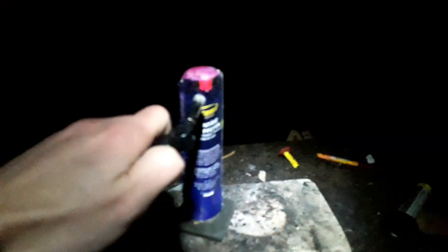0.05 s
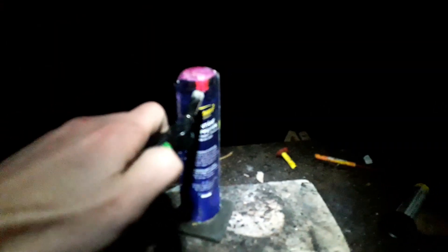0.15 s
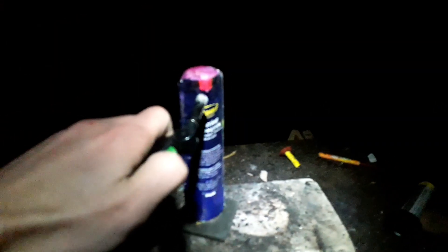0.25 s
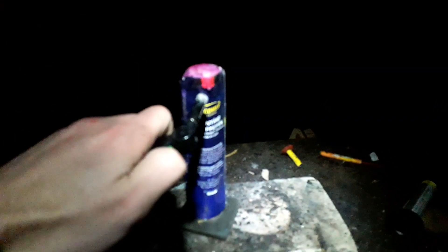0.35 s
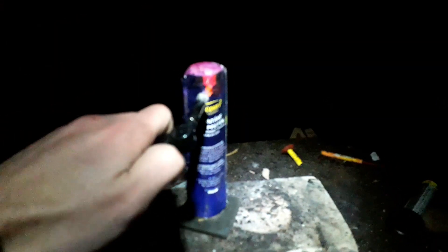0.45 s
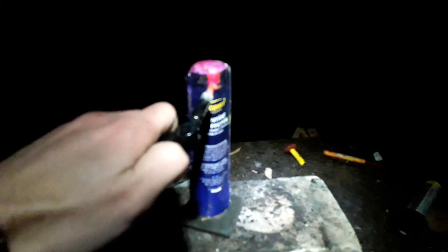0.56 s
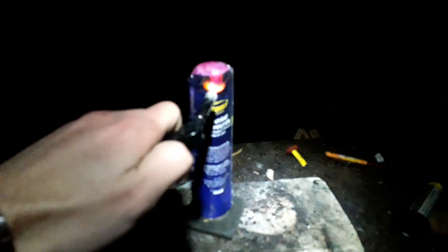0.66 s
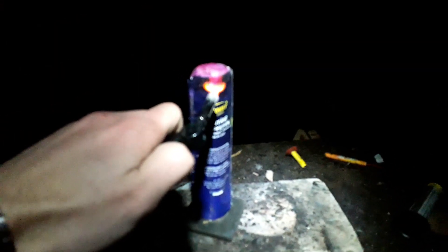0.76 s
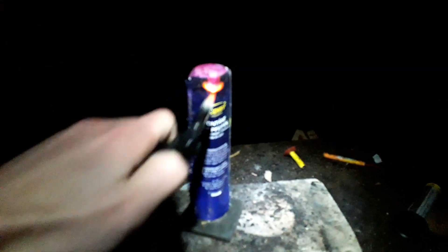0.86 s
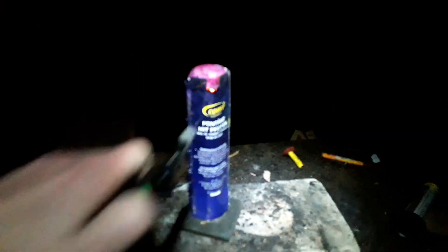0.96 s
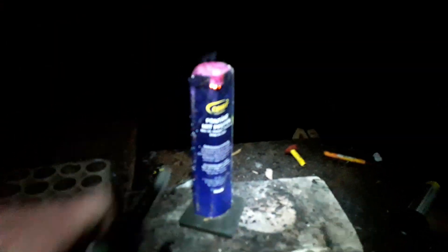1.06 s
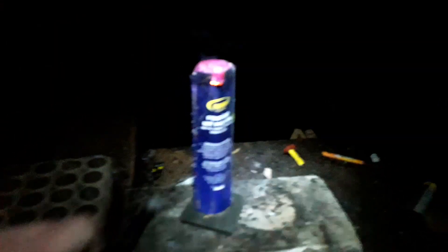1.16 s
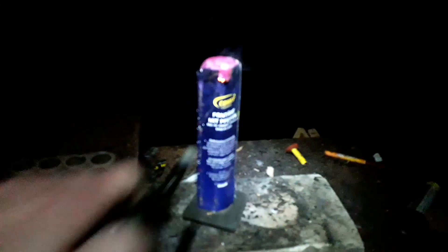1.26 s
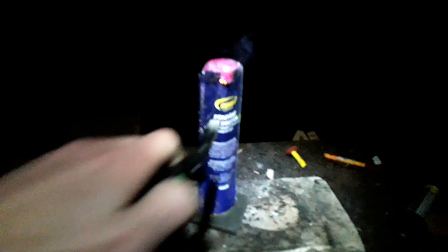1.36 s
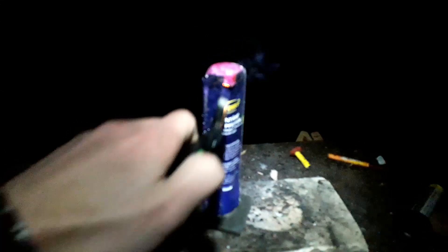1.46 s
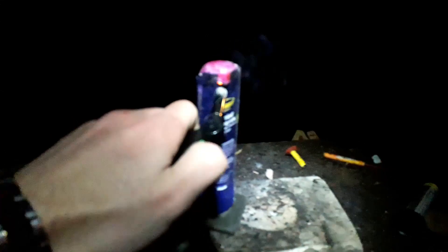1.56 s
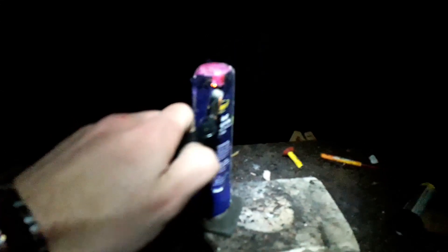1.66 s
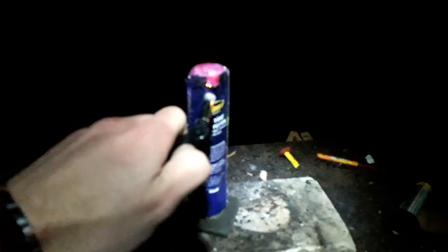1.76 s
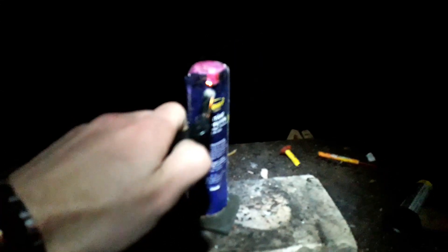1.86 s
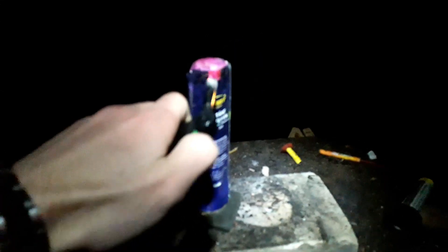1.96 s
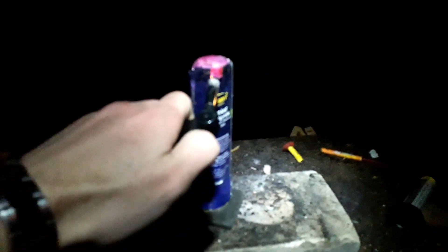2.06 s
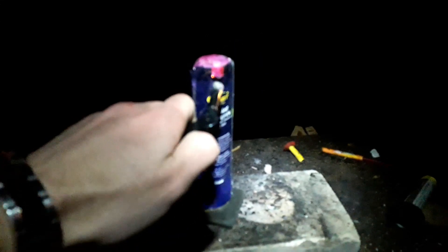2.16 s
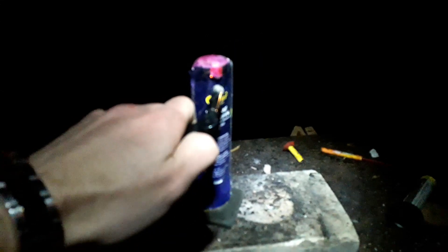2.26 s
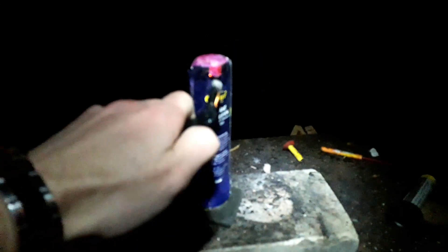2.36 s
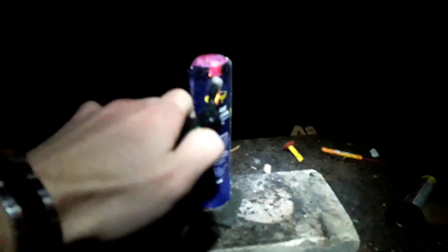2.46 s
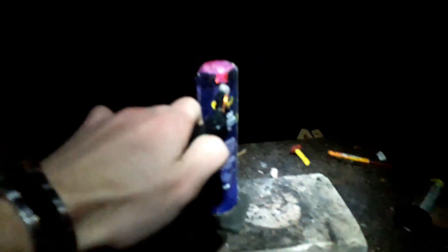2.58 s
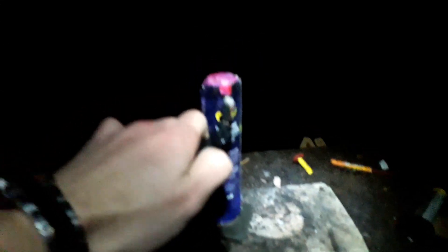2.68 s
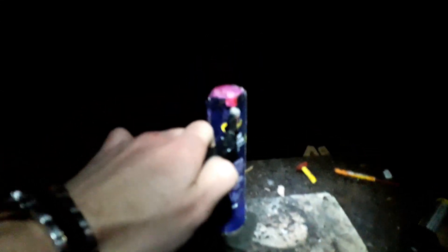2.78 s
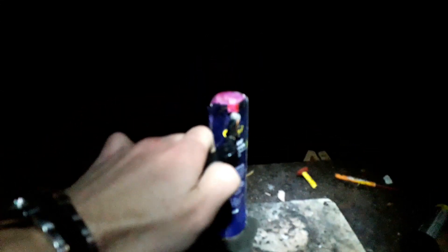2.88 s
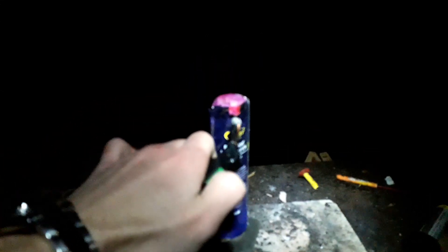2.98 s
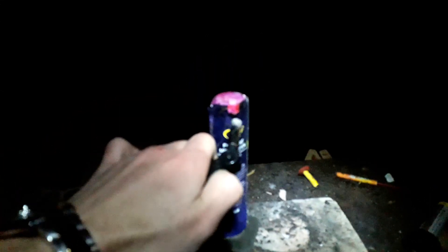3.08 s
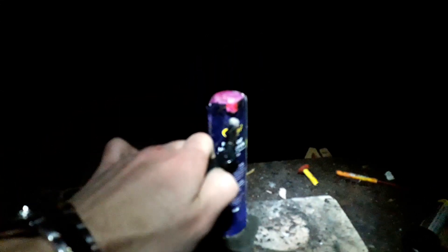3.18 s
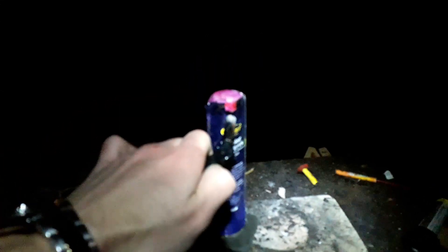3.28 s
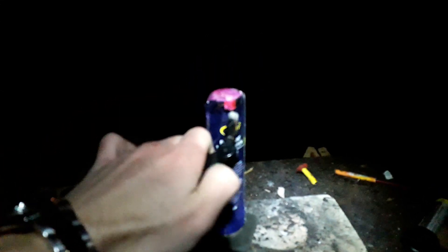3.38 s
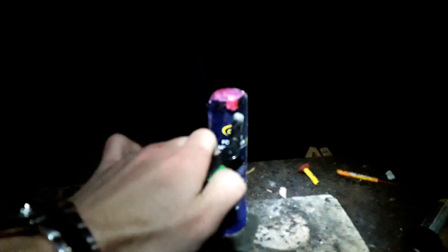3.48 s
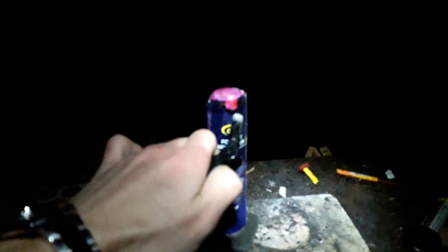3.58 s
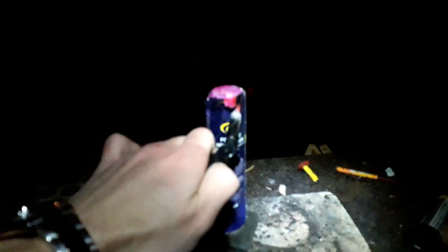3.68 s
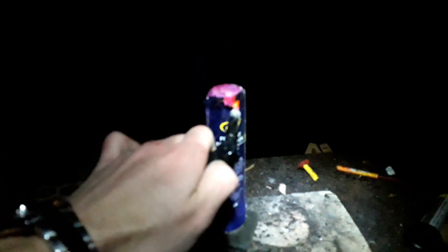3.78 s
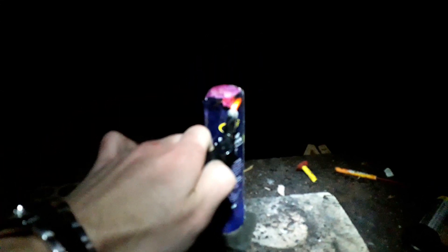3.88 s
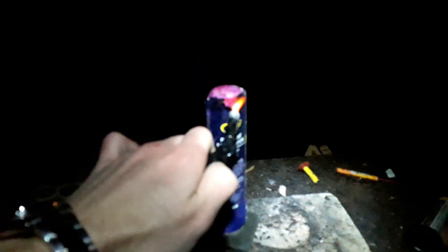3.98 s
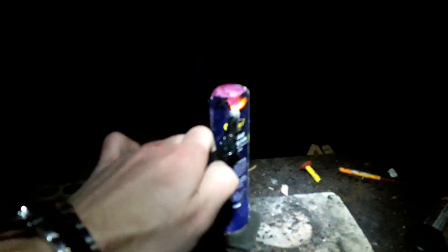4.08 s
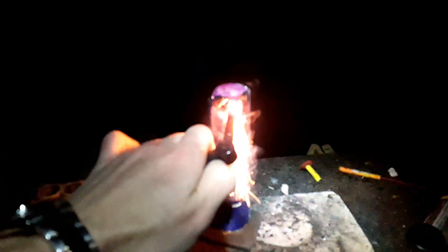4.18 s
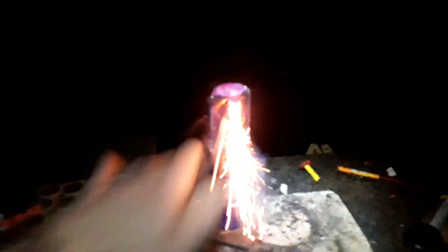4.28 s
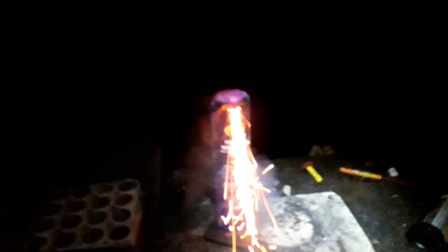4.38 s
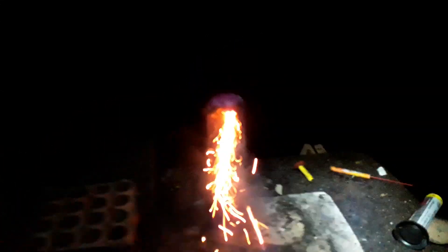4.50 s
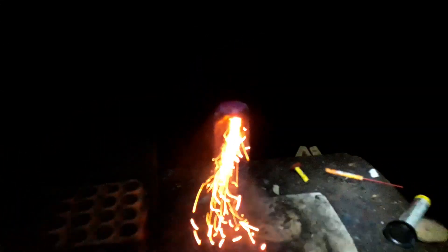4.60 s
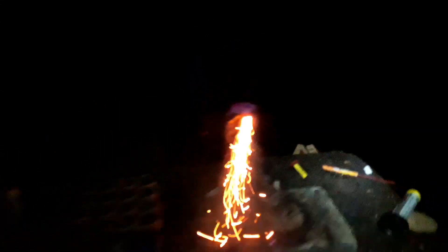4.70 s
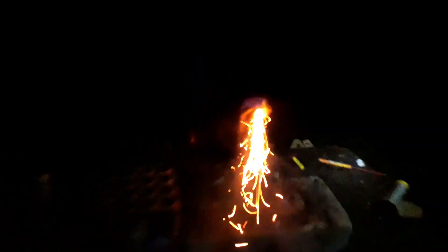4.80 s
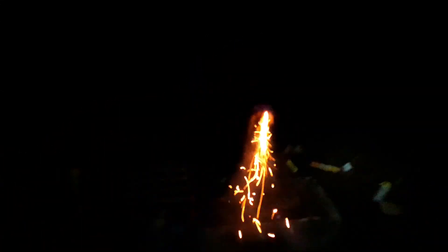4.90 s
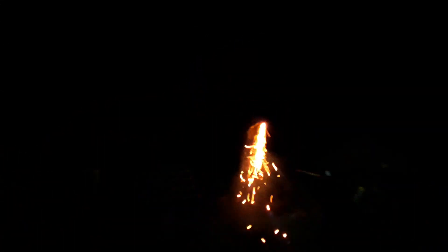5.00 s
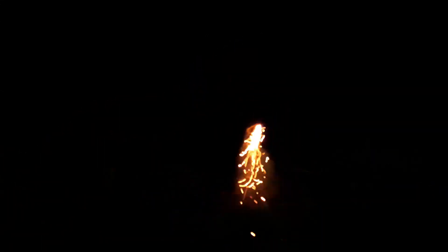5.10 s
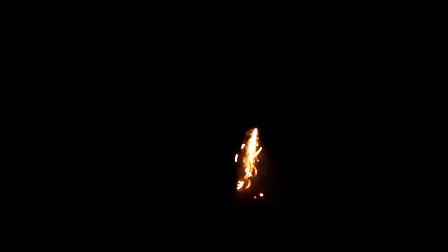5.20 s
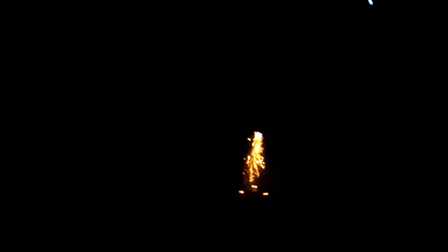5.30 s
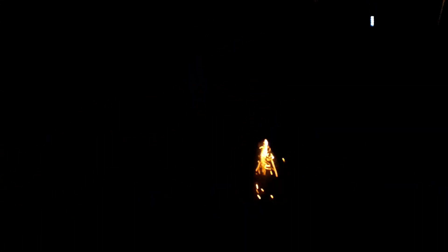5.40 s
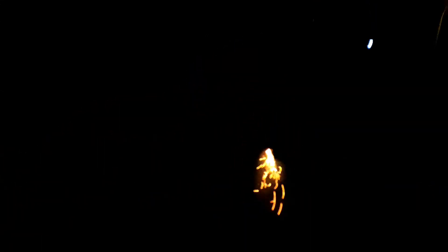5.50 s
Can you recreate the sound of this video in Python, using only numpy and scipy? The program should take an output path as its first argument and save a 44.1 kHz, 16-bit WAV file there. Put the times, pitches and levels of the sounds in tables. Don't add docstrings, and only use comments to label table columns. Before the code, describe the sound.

Hard metallic lighter clicks dominate in a dark yard, each followed by a lighter click as the trigger is released. Behind them are soft firework thumps, one stronger shot midway and brief dog yelps. The flame is nearly silent, then a fuse bursts into steady sputtering hiss, thinning and sweeping upward in tone as the listener retreats. A big firework blast rolls off houses; narrow-band, slightly clipped camera sound.

```python
import sys
import numpy as np
from scipy import signal
from scipy.fft import rfft, irfft, next_fast_len
from scipy.io import wavfile
from scipy.ndimage import uniform_filter1d, map_coordinates

SR = 44100
rng = np.random.default_rng(int(sys.argv[2]) if len(sys.argv) > 2 else 0)


def voltage_ratio(decibels):
    exponent = np.asarray(decibels, float) / 20
    return 10 ** exponent


def materialize(psi):
    bounded = np.clip(np.atleast_2d(psi).T, -1, 1)
    quanta = np.round(bounded * 32767).astype(np.int16)
    wavfile.write(sys.argv[1], SR, quanta)


N = 244622

# t/s, peak level/dB, top band/dB, low band/dB, rebound/dB
STRIKES = [
    (0.4452, 3.5, -3, -9.5, -2.5),
    (1.7209, 0.5, 0, -5, -4),
    (2.2136, 1, -1, -3.5, -3),
    (2.7273, 0, -2, -4, -5.5),
    (3.193, 1.5, -4.5, -6.5, -6),
    (3.669, 0, -4.5, -9.5, -1),
]
# t/s, hiss level/dB
FUSE_BURN = [(4.145, -38.5), (4.178, -34.5), (4.33, -27.5), (4.37, -29), (4.78, -29.5), (4.89, -28.5),
             (4.935, -33.5), (4.96, -29.5), (5.55, -36.5)]
# f/Hz, density/dB per Hz
JET_SPECTRUM = [(1180, -37.5), (2000, -7.5), (2400, -13), (2800, -26), (3390, -7.5), (3800, -6.5),
                (4400, -5.5), (4760, -2.5), (5510, -1), (6900, -10.5), (7460, -17.5), (8350, -6),
                (8800, -6), (12000, -19.5), (15800, -33.5)]
VALVE_S = 0.016


def in_time(rows, off=None):
    s, *columns = np.transpose(rows)
    return [np.interp(np.arange(N) / SR, s, c, left=off, right=off) for c in columns]


def rms_one(x):
    return x / np.sqrt(np.mean(x ** 2) + 1e-20)


def drift(rate):
    r = np.exp(-64 * np.pi * rate / SR)
    chance = rng.standard_normal(N // 32 + 1002)
    slow = signal.lfilter([1], [1, -2 * r, r * r], chance)[1000:]
    return np.interp(np.arange(N) / 32, np.arange(len(slow)), rms_one(slow))


def coloured(spectrum, patchy_db, shared_db, rate):
    size = next_fast_len(N)
    hz, db = np.transpose(spectrum)
    octave = np.log2(np.fft.rfftfreq(size, 1 / SR) + 1)
    shape = rfft(rng.standard_normal(size)) * voltage_ratio(np.interp(octave, np.log2(hz), db))
    out = 0
    for centre in range(int(np.log2(hz[0])), int(np.log2(hz[-1])) + 2):
        weight = np.clip(1 - abs(octave - centre), 0, 1)
        out = out + irfft(shape * weight, size)[:N] * voltage_ratio(patchy_db * drift(rate))
    return rms_one(out * voltage_ratio(shared_db * (drift(rate) + drift(4 * rate))))


def ring(force, hz, t60):
    r, w = voltage_ratio(-60 / (t60 * SR)), 2 * np.pi * hz / SR
    return signal.lfilter([.5, 0, -.5], [1, -2 * r * np.cos(w), r * r], force + 1e-18)


def band(x, low_hz, high_hz, order):
    return signal.sosfilt(signal.butter(order, [low_hz, high_hz], "band", fs=SR, output="sos"), x)


def low_pass(x, hz, order):
    return signal.sosfilt(signal.butter(order, hz, fs=SR, output="sos"), x)


def add(out, s, sound, peak_db):
    at = round(s * SR)
    out[at:at + len(sound)] += (voltage_ratio(peak_db) * sound / abs(sound).max())[:N - at]


def night():
    # f/Hz, density/dB per Hz
    hum_spectrum = [(20, -46), (40, -25), (100, -6), (200, -12), (500, -11), (800, -14), (1600, -23),
                    (2300, -28.5), (3100, -47.5), (4500, -44.5), (9000, -44.5), (15500, -54)]
    # t/s, level/dB
    town_level = [(0, -53), (2.0, -54.5), (2.5, -58.5), (3.2, -53.5), (4.2, -51.5), (5.55, -40)]
    mic_db, town_top_hz = -53, 3020
    noise = coloured(hum_spectrum, patchy_db=.9, shared_db=.3, rate=8)
    hz = np.fft.rfftfreq(N, 1 / SR)
    town = irfft(rfft(noise) / (1 + (hz / town_top_hz) ** 8), N)
    return voltage_ratio(in_time(town_level)[0]) * town + voltage_ratio(mic_db) * (noise - town)


def whisper():
    # opens t/s, shuts t/s, lower whisper/dB, upper whisper/dB
    openings = [
        (-.1, 0.21, -69, -70.5),
        (1.726, 2.01, -77.5, -73),
        (2.21, 2.474, -86, -79.5),
        (2.66, 2.967, -81, -80.5),
        (3.14, 3.462, -75.5, -79.5),
        (3.67, 3.718, -72, -80.5),
    ]
    # f/Hz, density/dB per Hz
    whisper_spectra = [
        [(3000, -31), (3700, -14), (4600, -10), (5100, 0.5), (5600, -20), (6300, -15.5), (7500, -22.5)],
        [(7000, -22.5), (8300, -9.5), (9400, -6.5), (10100, -0.5), (10900, -7), (11700, -13), (15500, -23)],
    ]
    surge_db, surge_t60_s = 4.5, 1
    t = np.arange(N) / SR
    lower, upper = 0, 0
    for opens, shuts, lower_db, upper_db in openings:
        flow = np.interp(t, [opens, opens + VALVE_S, shuts, shuts + VALVE_S], [0, 1, 1, 0])
        surge = 1 + voltage_ratio(surge_db - 60 * abs(t - opens) / surge_t60_s)
        lower = lower + voltage_ratio(lower_db) * flow * surge
        upper = upper + voltage_ratio(upper_db) * flow
    out = lower * coloured(whisper_spectra[0], patchy_db=0.8, shared_db=3.0, rate=25)
    return out + upper * coloured(whisper_spectra[1], patchy_db=3.0, shared_db=1.45, rate=28)


def rush():
    # t/s, level/dB
    hand_rub = [(0, -65), (.3, -71.5), (.5, -76.5), (.8, -73), (1.19, -77), (1.22, -92), (1.56, -84),
                (1.66, -62), (1.8, -65), (2.1, -72), (3.4, -74.5), (3.78, -83), (4.14, -92)]
    lag_s, rise_s, t60_s = .038, 0.026, 0.21
    puffs = np.zeros(N)
    puffs[[round((row[0] + lag_s) * SR) for row in STRIKES]] = voltage_ratio(-58)
    decay = signal.lfilter([1], [1, -voltage_ratio(-60 / (t60_s * SR))], puffs)
    puffs = uniform_filter1d(decay, round(rise_s * SR) + 1)
    level = np.hypot(puffs, voltage_ratio(in_time(hand_rub, off=-120)[0]))
    return level * coloured(JET_SPECTRUM, patchy_db=1.5, shared_db=1.2, rate=30)


def dog():
    # t/s, length/s, f/Hz, level/dB
    yelps = [
        (0.028, 0.065, 592, -55.5),
        (0.147, 0.14, 607, -46.5),
        (.32, 0.13, 609, -56),
    ]
    attack_s, hold, fade_db, sag_hz_per_s = .02, .5, 13, 330
    out = 0
    for s, length, start_hz, db in yelps:
        end = s + length
        hz, = in_time([(s, start_hz), (end, start_hz - sag_hz_per_s * length)])
        level, = in_time([(s, db + 0.5), (s + attack_s, db), (s + hold * length, db), (end, db - fade_db)],
                         off=-120)
        phase = 2 * np.pi * np.cumsum(hz) / SR
        for ratio, share, blur in ((1, 1, 70), (1.85, .5, 160), (2.85, .4, 140), (4.1, .15, 200)):
            tone = drift(blur) * np.sin(ratio * phase) + drift(blur) * np.cos(ratio * phase)
            out = out + voltage_ratio(level) * share * tone
    return out


def knock(modes, bands_db, rattle, rattle_s):
    # low f/Hz, high f/Hz
    housing_bands = [(1100, 2450), (3750, 6900), (7100, 10900), (11400, 13800)]
    t = np.arange(2500) / SR
    force = (t == 0) + rattle * rng.standard_normal(len(t)) * np.exp(-t / rattle_s)
    passed = sum(voltage_ratio(db) * band(force, low, high, order=5) for (low, high), db in zip(housing_bands, bands_db))
    rings = sum(voltage_ratio(db) * ring(force, hz, t60) for hz, db, t60 in modes)
    return passed + .3 * rings


def trigger(out):
    # t/s, peak level/dB, top band/dB
    creaks = [(.0807, -35, -17), (0.2493, -36, -15), (0.5082, -41, -1), (.524, -44, -11), (0.6854, -31, -3),
              (.703, -40, -3), (0.7542, -42.5, -12), (.325, -54, -10), (2.383, -52, -14),
              (1.1034, -46.5, -8.5), (1.542, -43.5, -14), (1.7832, -34, -1), (1.7988, -39.5, -3),
              (1.915, -38.5, -16.5), (1.944, -39.5, -20), (2.3427, -40, -14), (2.417, -51, -15.5),
              (2.689, -48, -5.5), (2.704, -50.5, -0.5), (2.807, -46, -5), (2.8827, -45.5, -5),
              (2.8884, -51, -7), (2.908, -47, -15), (3.0927, -47, -9), (3.2934, -44, -16),
              (3.3534, -51, -17), (3.38, -43.5, -15), (3.627, -38.5, 1), (3.712, -38.5, 1),
              (3.7306, -48, -15)]
    # t/s, peak level/dB, f/Hz, top band/dB
    releases = [(0.186, -8.5, 4500, -7.5), (0.5911, -27, 5200, -5), (0.9764, -20, 6040, -5),
                (1.7008, -30.5, 5030, -4), (2.0102, -6.5, 5370, -10), (2.0643, -27, 5200, -14.5),
                (2.18, -36, 5020, -3), (2.4819, -9, 4350, -9.5), (2.5354, -35.5, 5320, -13),
                (2.974, -10, 5700, -7.5), (3.032, -36, 3890, -15), (3.4387, -9.5, 5500, -11),
                (3.499, -31, 5360, -12)]
    # first t/s, last t/s, first level/dB, last level/dB, top band/dB
    squeezes = [
        (0.366, 0.423, -47, -39.5, -5),
        (0.842, 0.89, -46, -47.5, -13),
        (1.146, 1.193, -55, -56, -15),
        (1.6415, 1.692, -46.5, -42, -13),
        (2.118, 2.174, -45.5, -50, -12),
    ]
    # t/s, peak level/dB, f/Hz, top band/dB
    grain = [
        (4.3408, -8, 5600, -14),
    ]
    gap_s, jitter_s, spread_db = .0098, .0009, 2.5
    slips = []
    for first, last, first_db, last_db, top_db in squeezes:
        count = round((last - first) / gap_s) + 1
        for s, db in np.linspace((first, first_db), (last, last_db), count):
            s = s + jitter_s * rng.standard_normal()
            slips.append((s, db + spread_db * rng.standard_normal(), top_db))
    stutters = [(s + .0084 * rng.uniform(.6, 1.5), db - 10 * rng.uniform(.6, 2.4), top_db)
                for s, db, top_db in creaks]
    small = [(s, db, rng.uniform(4020, 5800), top_db) for s, db, top_db in creaks + slips + stutters]
    for s, db, hz, top_db in releases + grain + small:
        click = knock([(hz, -18, .004)], (-19, 0, top_db - 3.0, -38), 0.097, 0.0014)
        add(out, s + 0.00027, click, db)


def hammer(out):
    # f/Hz, level/dB, t60/s
    modes = [(190, -47, .035), (1350, -31, .008), (1850, -29, .007), (3280, -23, .018), (4550, -9, .006),
             (5750, -17, .006), (6400, -24, .025), (9620, -28, .02)]
    for s, db, top_db, low_db, rebound_db in STRIKES:
        for lag_s, part_db, mode_db in ((.0004, 0.14, 6), (.0015, rebound_db - 3, -13), (.0143, -35, -2)):
            bands_db = (low_db, mode_db, top_db - 1.5, top_db - 22.5)
            blow = knock(np.add(modes, [0, mode_db, 0]), bands_db, 0.28, 0.00088)
            add(out, s + lag_s, blow, db + part_db)


def lighter():
    out = np.zeros(N)
    trigger(out)
    hammer(out)
    out = low_pass(out, 14000, order=4)
    return signal.lfilter(*signal.iirnotch(2780, 6, fs=SR), out)


def fireworks():
    # t/s, peak level/dB, f/Hz, roll-back/dB
    far_bangs = [(.575, -27, 554, -11), (.604, -28.5, 394, -7), (.614, -26, 580, -14.5),
                 (1.146, -35, 303, -10), (1.834, -32.5, 363, -10.5), (1.911, -23.5, 343, -12.5),
                 (2.075, -35, 466, -11.5), (2.196, -28.5, 340, -8), (2.621, -40, 399, -11),
                 (2.907, -25.5, 886, -10), (3.034, -28, 641, -7.5), (3.264, -24.5, 530, -9),
                 (3.399, -43.5, 758, 7), (3.627, -28.5, 533, -9), (3.828, -29.5, 565, -12.5),
                 (3.887, -29.5, 463, -6.5), (4.047, -22, 497, -8), (4.091, -29.5, 510, -12.5),
                 (4.246, -37, 524, 9.5), (4.628, -29, 480, -11), (5.42, -17.5, 480, -8.5)]
    # t/s, peak level/dB, f/Hz, roll-back/dB, crack/dB
    near_shots = [
        (2.7883, -8, 630, -20, -6.5),
        (2.857, -25.5, 640, -16, -14),
        (4.638, -18, 640, -21, -10.5),
        (5.3038, -2, 422, -20, -13.5),
        (5.3079, -17.5, 680, -10, -3),
        (5.3098, -4.5, 365, -14, -28),
        (5.3129, -1.5, 566, -20.5, -10),
        (5.3169, -13, 436, -32, -8),
    ]
    far_crack_db, far_t60_s, near_t60_s = -22.5, 1.5, 1.55
    thump_db, thump_hz = -21.5, 140
    out, t = np.zeros(N), np.arange(SR) / SR
    click = signal.unit_impulse(4000) + 0.39 * signal.unit_impulse(4000, round(.0018 * SR))
    thump = band(click, 0.57 * thump_hz, 1.87 * thump_hz, order=2)
    shots = [(*row, far_crack_db, far_t60_s) for row in far_bangs] + [(*row, near_t60_s) for row in near_shots]
    for s, db, hz, roll_db, crack_db, t60 in shots:
        add(out, s, -band(click, .5 * hz, 1.325 * hz, order=3), db - 3.5)
        add(out, s, thump, db + thump_db)
        add(out, s + 0.45 / hz, band(click, 2.03 * hz, 1900, order=2), db + crack_db)
        lumps = voltage_ratio(2.5 * rng.standard_normal(300).repeat(147))
        echoes = rng.standard_normal(SR) * lumps
        fade = -60 * t / t60 - 6.5 * (1 - np.exp(-t / 0.15))
        echoes = echoes * voltage_ratio(fade)
        roll = band(echoes, 0.3 * hz, 1.75 * hz, order=3)
        roll = roll + voltage_ratio(.5 * crack_db - 26.5) * band(echoes, 1000, 3000, order=1)
        add(out, s, roll * (1 - np.exp(-t / 0.0026)), db + roll_db)
    return low_pass(out, 3700, order=6)


def flame():
    lit_s = 3.72
    lit, = in_time([(lit_s, 0), (lit_s + VALVE_S, 1), (FUSE_BURN[0][0], 1)], off=0)
    whistle = rms_one(ring(rng.standard_normal(N), 5060, 0.0074))
    return voltage_ratio(-76 + 1.5 * drift(15.6)) * lit * whistle


def fuse():
    # f/Hz, density/dB per Hz
    roar_spectrum = [(100, -30.5), (300, 1), (700, 1.5), (1500, 3), (2100, -8.5), (2500, -7), (2900, -7.5),
                     (4000, -1)]
    # t/s, distance/m, slab echo share 0-1
    retreat = [(4.15, 1.0, .16), (4.76, 1.0, .2), (5.34, 1.29, .42), (5.55, 1.5, .38)]
    roar_db, roar_build_s = -9.5, 0.021
    slab_ms_at_1_m, ground_ms_at_1_m, ground_share = .94, .70, .7
    burn = voltage_ratio(in_time(FUSE_BURN, off=-120)[0])
    since_catch = np.maximum(np.arange(N) / SR - FUSE_BURN[0][0], 0)
    built = 1 - np.exp(-since_catch / roar_build_s)
    jet = burn * coloured(JET_SPECTRUM, patchy_db=1.44, shared_db=1.06, rate=23)
    roar = coloured(roar_spectrum, patchy_db=0.0, shared_db=1.0, rate=36)
    jet = jet + burn * built * voltage_ratio(roar_db) * roar
    metres, slab = in_time(retreat)
    ground = ground_share * slab
    slab_echo, ground_echo = [map_coordinates(jet, [np.arange(N) - ms / metres * SR / 1000], order=3)
                              for ms in (slab_ms_at_1_m, ground_ms_at_1_m)]
    return (jet + slab * slab_echo + ground * ground_echo) / np.sqrt(1 + slab ** 2 + ground ** 2)


def scene():
    return (night() + whisper() + rush() + dog() + lighter() + fireworks() + flame() + fuse())[None]


def top_cut(x):
    return signal.sosfilt(signal.butter(12, 16650, fs=SR, output="sos"), x)


def record(dry):
    clip_top = .86
    mix = signal.sosfilt(signal.butter(2, 45, "high", fs=SR, output="sos"), dry)
    mix = np.clip(mix, -clip_top, clip_top)
    mix = signal.sosfilt(signal.cheby2(20, 60, 16100, fs=SR, output="sos"), mix)
    return top_cut(mix)


dry = scene()
out = record(dry)
materialize(out)
```